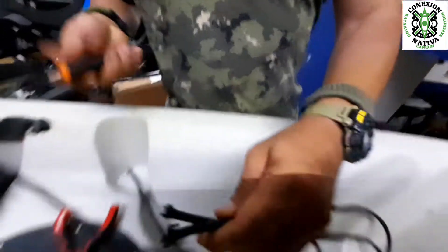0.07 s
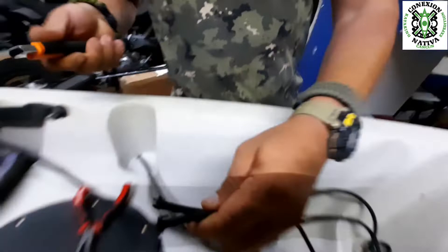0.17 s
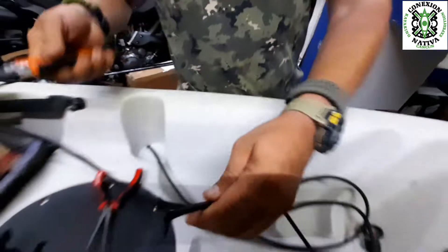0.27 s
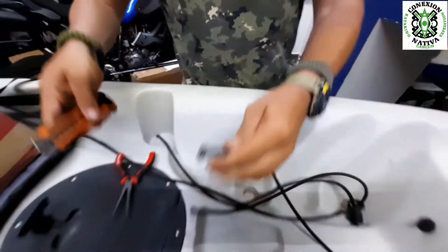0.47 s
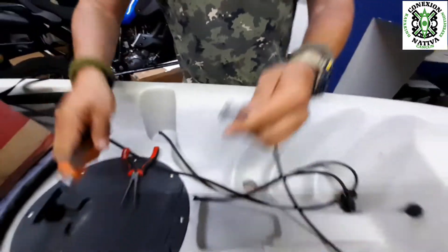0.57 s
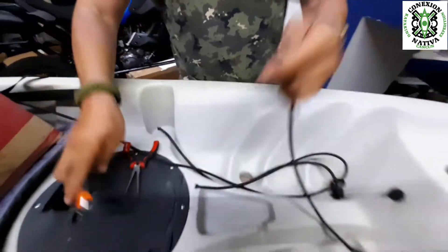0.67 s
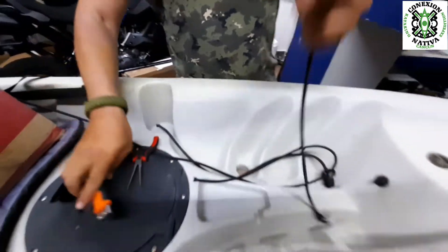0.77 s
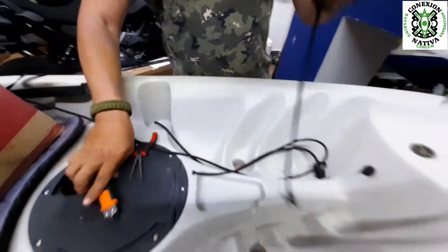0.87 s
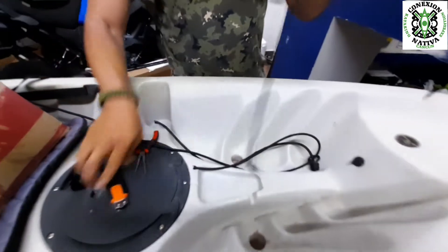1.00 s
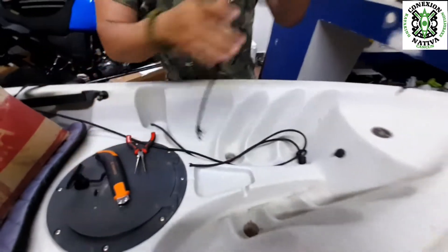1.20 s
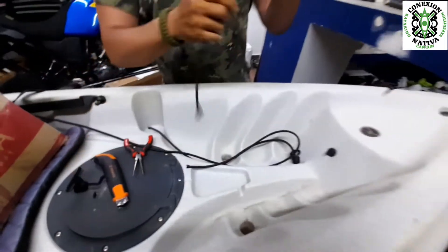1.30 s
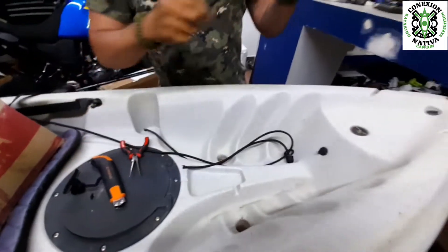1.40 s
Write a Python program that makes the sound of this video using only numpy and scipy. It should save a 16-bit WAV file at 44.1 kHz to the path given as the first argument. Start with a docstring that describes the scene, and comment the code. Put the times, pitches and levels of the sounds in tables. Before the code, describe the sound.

Close up in a small room, a utility knife ratchets open with rapid, crisp clicks. A cord ticks faintly against plastic, then the knife lands on a plastic boat's hatch with a few hollow, booming knocks.

```python
"""In a small workshop, a utility knife's blade ratchets out: the slider's spring snaps over nine notches,
and each impulse excites the damped modes of the plastic handle, the steel channel and the blade.
The knife is then laid on the hatch of a hollow plastic hull, which knocks and booms as the knife rocks
to rest. A cord squeaks, flicks the hull and slides through a hand with the hiss of friction.
The room answers with early reflections and a short diffuse tail."""
import sys
import numpy as np
from scipy import signal
from scipy.fft import rfft, irfft, next_fast_len
from scipy.io import wavfile
from scipy.ndimage import uniform_filter1d, map_coordinates

SR = 44100
rng = np.random.default_rng(int(sys.argv[2]) if len(sys.argv) > 2 else 0)


def dump(signal):
    """Clip the signal to [-1, 1] and save it as 16-bit WAV at the path in sys.argv[1]."""
    limited = np.clip(np.atleast_2d(signal).T, -1, 1)
    pcm = np.round(limited * 32767).astype(np.int16)
    wavfile.write(sys.argv[1], SR, pcm)


N = 63945
T = np.arange(SR) / SR

# The room's reverberation. Each row: frequency in Hz, T60 (time to fall 60 dB) in seconds.
ROOM_T60 = [(100, 0.51), (500, 0.5), (1500, 0.54), (4000, 0.49), (7000, 0.44), (14000, 0.21)]
# Likeness of the noise at the two ears. Each row: frequency in Hz, correlation.
EAR_CORRELATION = [(100, 0.85), (300, 0.72), (1000, 0.25), (3000, 0.22), (8000, 0.19), (15000, 0.13)]

# Envelopes of handling rumble, rustle and the sliding cord. Each row: time in seconds, level in dB.
RUMBLE_LEVELS = [(0, -49.5), (.2, -49.5), (.38, -39.5), (.48, -51), (.62, -52), (.7, -54), (.82, -55.5),
                 (1.1, -48), (1.32, -55), (1.45, -56)]
RUSTLE_LEVELS = [(0, -48.5), (.04, -45.5), (.12, -56.5), (.4, -63), (.55, -50.5), (.7, -61), (.82, -59.5),
                 (1.2, -60), (1.45, -60.5)]
SLIDE_LEVELS = [(1.15, -74), (1.28, -62.5), (1.39, -52.5), (1.45, -55.5)]

# Spectra of friction and impact noise. Each row: frequency in Hz, relative spectral density in dB.
RUMBLE_SPECTRUM = [(20, -17), (40, 2.5), (70, -1), (115, 2), (170, -9.5), (300, -13.5), (600, -25.5),
                   (1500, -26.5), (5000, -55)]
RUSTLE_SPECTRUM = [(100, 7), (300, 8), (800, 2.5), (1400, -2.5), (2500, -7), (4000, -18.5), (6500, -20.5),
                   (9000, -28.5), (15500, -25.5)]
SLIDE_SPECTRUM = [(800, -30.5), (2300, 4.5), (3300, -3), (6500, 4), (8400, -5), (12500, 5), (15800, -3.5)]
TAP_SPECTRUM = [(200, -7), (580, -5.5), (800, -10), (1100, 4.5), (1500, -9), (2400, -9), (3200, -23),
                (9000, -53.5)]
THUD_SPECTRUM = [(60, -8.5), (130, -1), (250, -3), (450, -15.5), (900, -16), (3000, -50.5)]
WASH_SPECTRUM = [(90, -9), (190, 0), (380, -3.5), (650, -6.5), (800, -10), (1000, -7), (1350, -15),
                 (3000, -47.5)]
CLACK_SPECTRUM = [(40, -31), (100, 4), (300, -3.5), (430, -3), (600, 2.5), (790, -5.5), (1030, 0.5),
                  (1350, -5), (1570, -5.5), (1950, -2), (2600, -8.5), (3100, -25.5), (6000, -34),
                  (15000, -59)]
RATTLE_SPECTRUM = [(1000, -27), (2600, -11), (3200, 1.5), (4000, 3.5), (6000, 1), (8500, -11), (12000, -9),
                   (15800, -15)]
TICK_SPECTRUM = [(300, -23.5), (1200, -2.5), (2000, 1), (2450, 6.5), (3400, -7), (4600, 0.5), (6600, -0.5),
                 (8500, -7.5), (15000, -8)]
SNAP_SPECTRUM = [(200, -27), (1000, -20), (1300, -19), (1600, -9), (2000, -8), (2400, -1), (3600, -3),
                 (5200, -3), (6700, 2), (8200, -6), (9900, 0.5), (12600, 1.5), (15800, -2.5)]

# Modes of the struck parts. Each row: frequency in Hz, relative level in dB, T60 in seconds.
FLICK_MODES = [(820, 0, 0.028), (1095, -0.5, 0.025), (1410, -1.5, 0.017), (1850, -4, 0.023),
               (2990, -13.5, 0.018)]  # the hull under the cord's flick
HULL_MODES = [(116.1, -11, 0.56), (153, -4.5, 0.13), (188.8, -12, 0.34), (236.4, -8, 0.17),
              (259.7, -5, 0.22), (292.8, -2.5, 0.21), (347.6, -10.5, 0.19), (474.8, -9, 0.23),
              (566.4, -7, 0.13), (630.5, -14, 0.14)]
HATCH_MODES = [(600, 1, 0.026), (1000, -2.5, 0.02)]
FLEX_MODES = [(108.8, -2, 0.088), (166.2, 3.5, 0.073)]  # the hatch gives under the knife's weight
SHELL_MODES = [(1880, -7, 0.016), (2000, 0, 0.019), (2400, 0, 0.016), (2570, 1.5, 0.015)]  # the handle's shell as it lands
BLADE_MODES = [(3164, -22.5, 0.06), (6500, -9, .03), (6500, -24, 0.046)]

# Modes tuned for each contact. Each row: multiple of the pitch, relative level in dB, T60 in seconds.
TAP_MODES = [(1, 2, 0.064), (1.83, 0.5, 0.039), (1.99, -1, 0.017), (3.25, -11.5, 0.04)]
HANDLE_MODES = [(1, -6.5, 0.044), (1.09, -12.5, 0.064), (0.95, -17.5, 0.03)]
CHANNEL_MODES = [(.92, -8, 0.029), (1, -6.5, .026), (1.1, -10.5, 0.027)]  # the steel channel that guides the blade

# Cord and tools tap the hull. Each row: start in seconds, click level in dB, thud level in dB, pitch in Hz.
TAPS = [(0.4345, -32.5, -38.5, 588), (.4630, -33, -36, 566), (0.543, -35, -46, 583)]
# The knife meets the hatch. Each row: start in seconds, then the levels in dB of
# hull boom, hatch flex, hatch clack, handle shell and blade rattle.
KNOCKS = [(0.8621, -21.5, -22.5, -13, -7, -32), (0.9117, -31.5, -26, -16.5, -18, -40),
          (0.9170, -21.5, -17.5, -33, -48, -65), (0.9774, -22.5, -20, -15, -18, -30.5),
          (1.0140, -26, -41, -21, -23, -46.5), (1.0303, -28.5, -24, -35, -49, -65)]
# The thumb takes up the slider's play. Each row: start in seconds, level in dB.
THUMB_TICKS = [(0.0143, -47), (0.1327, -32.5), (0.1504, -37.5), (0.1737, -33), (0.201, -47.5)]
# The slider's notches. Each row: start in seconds, level in dB, handle pitch in Hz, channel pitch in Hz,
# relative channel level in dB, lead of the tooth's tick in seconds, relative level of that tick in dB.
NOTCHES = [(0.2192, -16.5, 1513, 2473, 3.5, 0.0057, -16), (0.2499, -18, 1535, 2520, -0.5, 0.0034, -6.5),
           (0.2744, -17, 1597, 2440, 3.5, 0.0037, -5), (0.3028, -17.5, 1618, 2624, 6, 0.0049, -7),
           (.3263, -16, 1630, 2392, 3.5, 0.0049, -6.5), (0.3495, -15, 1766, 2576, 2.5, 0.0038, -7),
           (.3755, -14, 1906, 2660, -9.5, 0.0057, -22.5), (.4047, -13.5, 1425, 3204, -3, 0.0044, -9),
           (.4540, -15, 1887, 3064, 0.5, 0.0060, -5.5)]

BOOM_RISE_S = 0.0019
BLADE_DB_PER_NOTCH = 3.5  # the blade rings more freely the further it stands out
HANDLE_DB_PER_NOTCH = -0.04  # the handle rings less as the blade leaves it


def amp(db):
    """Amplitude grows tenfold with every 20 dB."""
    return 10 ** (np.asarray(db) / 20)


def unit_rms(x):
    """Dividing by the rms gives a signal unit power."""
    return x / np.sqrt(np.mean(x ** 2) + 1e-20)


def curve_at(points, hz):
    """Interpolation between (Hz, value) points on a logarithmic frequency axis."""
    freqs, values = np.transpose(points)
    return np.interp(np.log(hz + 1), np.log(freqs + 1), values)


def filtered(x, response):
    """A linear filter multiplies the spectrum by its frequency response."""
    size = next_fast_len(x.shape[-1] + 8192)
    return irfft(rfft(x, size) * response(np.fft.rfftfreq(size, 1 / SR)), size)[..., :x.shape[-1]]


def add(track, start, x):
    """Superposition: x adds to the track from its start in seconds."""
    part = track[:, max(round(start * SR), 0):][:, :x.shape[-1]]
    part += x[..., :part.shape[1]]


def noise(spectrum, envelope):
    """Shaped stereo noise of unit rms; the balance of mid and side sets the correlation of the ears."""
    angle = lambda hz: np.arccos(np.clip(curve_at(EAR_CORRELATION, hz), -1, 1)) / 2
    colour = lambda hz: amp(curve_at(spectrum, hz)) * [np.cos(angle(hz)), np.sin(angle(hz))]
    mid, side = filtered(rng.standard_normal((2, len(envelope))) * envelope, colour)
    return unit_rms(np.array([mid + side, mid - side]))


def contact(spectrum, hold, t60):
    """Dense micro-impacts merge into a noise burst that lasts `hold` seconds, then decays exponentially."""
    t = T[:SR // 10]
    envelope = np.minimum(t / 0.00077, 1) * amp(-60 * np.maximum(t - hold, 0) / t60)
    grain = np.exp(0.2 * unit_rms(uniform_filter1d(rng.standard_normal(len(t)), size=10)))
    return noise(spectrum, grain * envelope) * np.sqrt(np.mean(envelope ** 2))


def ring(modes, scale=1, rise=0.003, spread=0):
    """Free vibration is a sum of damped modes; spread, in radians, scatters their phase at each ear."""
    phases = spread * rng.standard_normal((len(modes), 2, 1))
    tone = 0
    for (freq, db, t60), phase in zip(modes, phases):
        strike_db = db + 1.2 * rng.normal()  # no two strikes are alike
        tone += amp(strike_db - 60 * T / t60) * np.sin(2 * np.pi * freq * scale * T + phase)
    return tone * (1 - np.exp(-T / rise))


def in_room(x, tail_db, early_db):
    """Reverberation: convolution adds early reflections and a diffuse tail to the direct sound."""
    x = np.broadcast_to(x, (2, x.shape[-1]))
    hz, t, bands = signal.stft(rng.standard_normal((2, SR)), SR, nperseg=256)
    decay = amp(-60 * t / curve_at(ROOM_T60, hz)[:, None])
    tail = signal.istft(bands * decay, SR, nperseg=256)[1][:, :SR]
    early = rng.standard_normal((2, SR)) * amp(-60 * T / 0.062)
    onset = 1 - np.exp(-(T / 0.0056) ** 2)
    echoes = (amp(tail_db) * unit_rms(tail * onset) + amp(early_db) * unit_rms(early * onset)) / np.sqrt(SR)
    angle = lambda f: np.arccos(1 / (1 + (f / 700) ** 2)) / 2  # the ears agree in the bass
    mid = filtered(echoes[0], lambda f: np.cos(angle(f)))
    side = filtered(echoes[1], lambda f: np.sin(angle(f)))
    out = signal.fftconvolve(x, np.array([mid + side, mid - side]), axes=1)
    add(out, 0, x)
    return out


def friction(levels, spectrum, rough_db):
    """Sliding friction makes noise whose level wavers as the surfaces catch unevenly."""
    t = np.arange(N) / SR
    catch = map_coordinates(rng.standard_normal(N // 100), [t * 120])  # 120 random values a second
    return amp(np.interp(t, *np.transpose(levels)) + rough_db * catch) * noise(spectrum, np.ones(N))


def cord_squeak():
    """The gripped cord squeaks faintly: a tone under random frequency modulation."""
    out = np.zeros((2, N))
    length_s, pitch_hz = 0.092, 788
    t = T[:round(length_s * SR)]
    waver = map_coordinates(rng.standard_normal(200), [t * 150])
    phase = 2 * np.pi * np.cumsum(pitch_hz * (1 + 0.02 * waver)) / SR
    add(out, start=0.02, x=amp(-50.5) * np.sin(np.pi * t / length_s) * np.sin(phase))
    return out


def cord_flick():
    """The lifted cord strikes the hull once; heavy damping leaves only a dry tick."""
    out = np.zeros((2, N))
    tick = ring(FLICK_MODES, rise=0.0014, spread=0.26)
    add(out, start=0.7852, x=amp(-31) * in_room(tick, tail_db=-17, early_db=-24))
    return out


def hull_taps():
    """Light impacts excite short, hollow resonances of the hull, each with a dull thud."""
    out = np.zeros((2, N))
    for start, click_db, thud_db, hz in TAPS:
        click = np.zeros((2, SR))
        add(click, 0, amp(-2.5) * contact(TAP_SPECTRUM, hold=0.0031, t60=0.023))
        add(click, 0, ring(TAP_MODES, hz, rise=0.0018))
        add(out, start, amp(click_db) * in_room(click, tail_db=-12.5, early_db=-19))
        thud = contact(THUD_SPECTRUM, hold=0.0059, t60=0.034)
        add(out, start, amp(thud_db) * in_room(thud, tail_db=-5.5, early_db=-10))
    return out


def hull_wash(t60):
    """Modal overlap: the hull's crowded modes blur into a rough, fading thud."""
    envelope = (1 - np.exp(-T / BOOM_RISE_S)) * amp(-60 * T / t60)
    return amp(-8) * noise(WASH_SPECTRUM, envelope) * np.sqrt(np.mean(envelope ** 2))


def knife_on_hatch():
    """An impact excites both bodies: handle and blade ring and rattle, hatch and hull clack and boom."""
    out = np.zeros((2, N))
    for start, boom_db, flex_db, clack_db, shell_db, rattle_db in KNOCKS:
        clack = np.zeros((2, SR))
        add(clack, 0, amp(clack_db - 6.5) * contact(CLACK_SPECTRUM, hold=0.0041, t60=0.022))
        add(clack, 0, amp(clack_db) * ring(HATCH_MODES, rise=0.002))
        add(clack, 0, amp(shell_db) * ring(SHELL_MODES, spread=0.4))
        add(out, start, in_room(clack, tail_db=-13, early_db=-13.5))
        boom = ring(HULL_MODES, rise=BOOM_RISE_S)
        add(out, start, amp(boom_db) * in_room(boom, tail_db=-12, early_db=-7.5))
        add(out, start, amp(boom_db) * hull_wash(t60=0.31))
        add(out, start, amp(flex_db) * ring(FLEX_MODES, rise=0.0063))
        rattle = contact(RATTLE_SPECTRUM, hold=0.0053, t60=0.025)
        add(out, start, amp(rattle_db) * in_room(rattle, tail_db=-11, early_db=-14.5))
    return out


def slider():
    """Impulse excitation: the spring ticks up each tooth, snaps in and rings handle, channel and blade."""
    out = np.zeros((2, N))
    for k, (start, db, handle_hz, channel_hz, channel_db, lead_s, tooth_db) in enumerate(NOTCHES):
        blade_db = BLADE_DB_PER_NOTCH * (k + 1 - len(NOTCHES))
        snap = np.zeros((2, SR))
        add(snap, 0, contact(SNAP_SPECTRUM, hold=0.003, t60=0.016))
        add(snap, 0, amp(HANDLE_DB_PER_NOTCH * k) * ring(HANDLE_MODES, handle_hz, rise=0.0027, spread=0.92))
        add(snap, 0, amp(channel_db) * ring(CHANNEL_MODES, channel_hz, rise=0.0019, spread=1))
        add(snap, 0, amp(blade_db) * ring(BLADE_MODES, spread=1))
        add(out, start, amp(db) * in_room(snap, tail_db=-10, early_db=-12))
        add(out, start - lead_s, amp(db + tooth_db) * contact(SNAP_SPECTRUM, hold=0.0025, t60=0.015))
    for start, db in THUMB_TICKS:
        tick = contact(TICK_SPECTRUM, hold=0.0025, t60=0.024)
        add(out, start, amp(db) * in_room(tick, tail_db=-7, early_db=-22))
    return out


def scene():
    """Time and level differences between the ears place the knife a little left, the cord's flick right."""
    left = np.array([[1], [-1]])
    lead_left = lambda x, seconds: filtered(x, lambda hz: np.exp(1j * np.pi * hz * seconds * left))
    ratchet = lead_left(slider(), 0.00012)
    knocks = lead_left(knife_on_hatch() + hull_taps(), 0.00014)
    flick = lead_left(cord_flick(), -0.00012) * amp(-1.2 * left)
    handling = friction(RUMBLE_LEVELS, RUMBLE_SPECTRUM, rough_db=1.66)
    handling += friction(RUSTLE_LEVELS, RUSTLE_SPECTRUM, rough_db=0.5)
    handling += friction(SLIDE_LEVELS, SLIDE_SPECTRUM, rough_db=0.5)
    return handling + cord_squeak() + flick + (ratchet + knocks) * amp(0.51 * left)


def record(dry):
    """The microphone acts as a band-pass filter, dropping the deepest bass and the highest treble."""
    low_cut_hz, top_hz = 52.4, 15900
    thinned = signal.sosfilt(signal.butter(4, low_cut_hz, "highpass", fs=SR, output="sos"), dry)
    return filtered(thinned, lambda hz: 1 / (1 + (hz / top_hz) ** 240))


dry = scene()
out = record(dry)
dump(out)
```